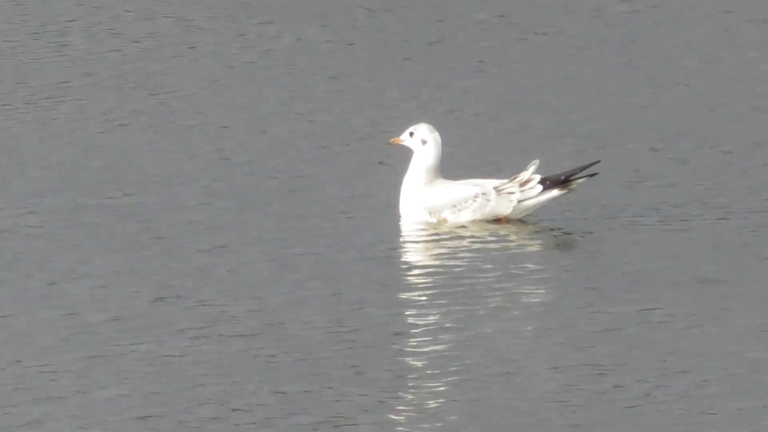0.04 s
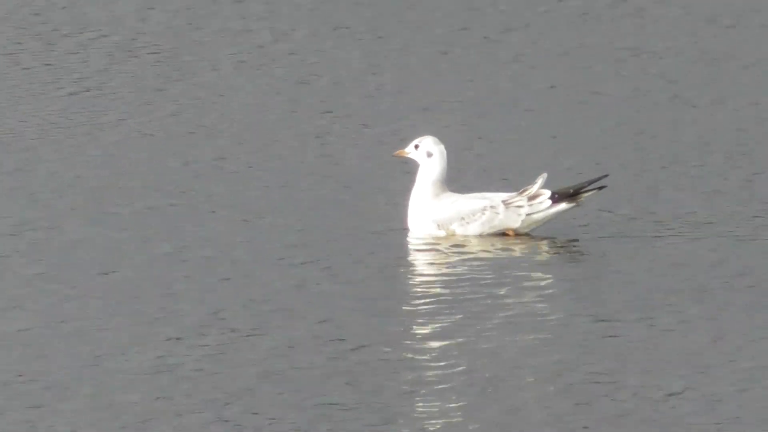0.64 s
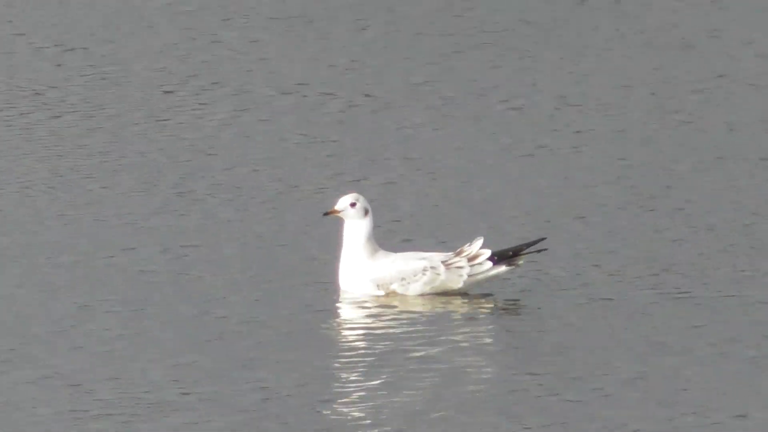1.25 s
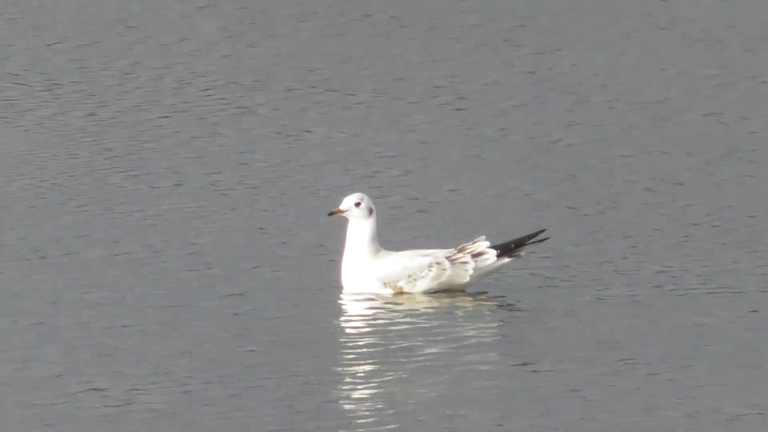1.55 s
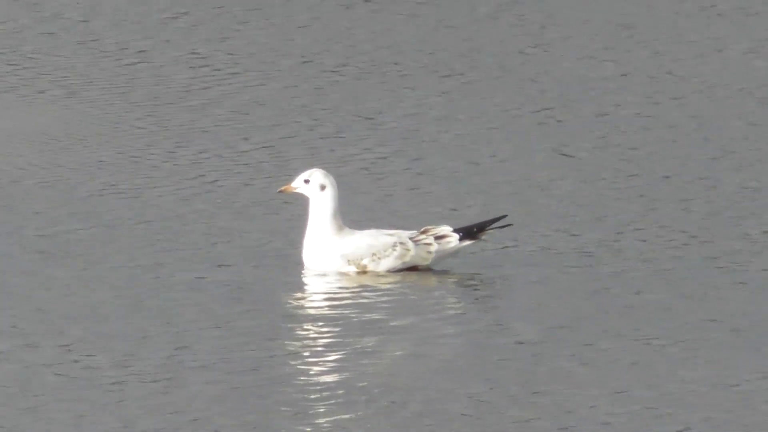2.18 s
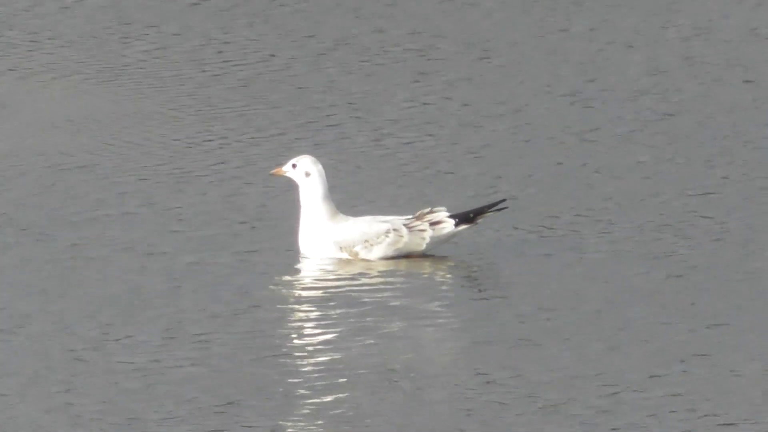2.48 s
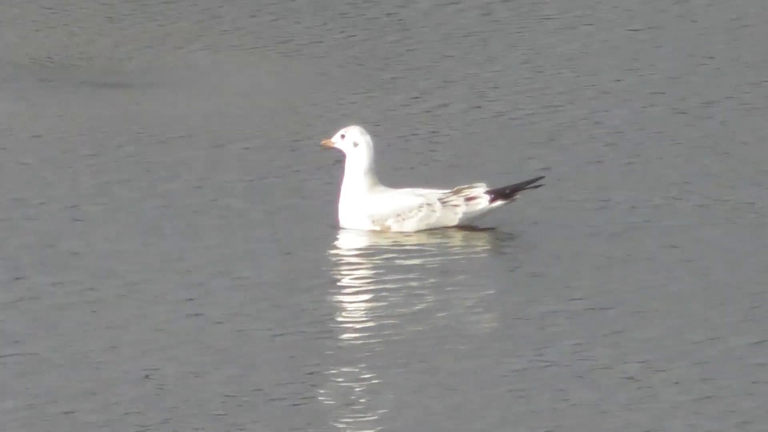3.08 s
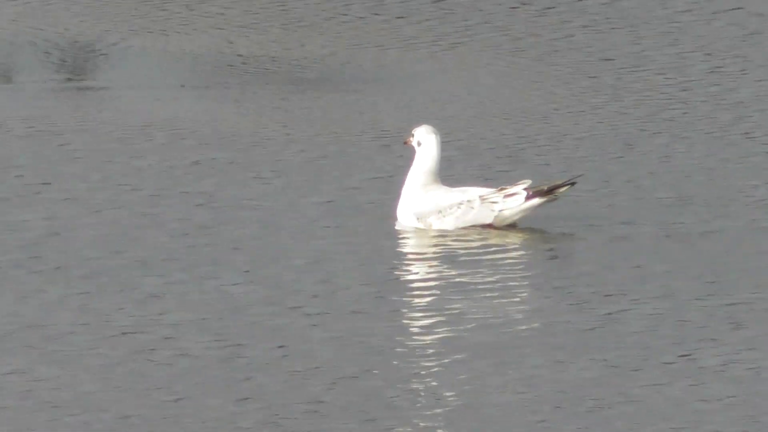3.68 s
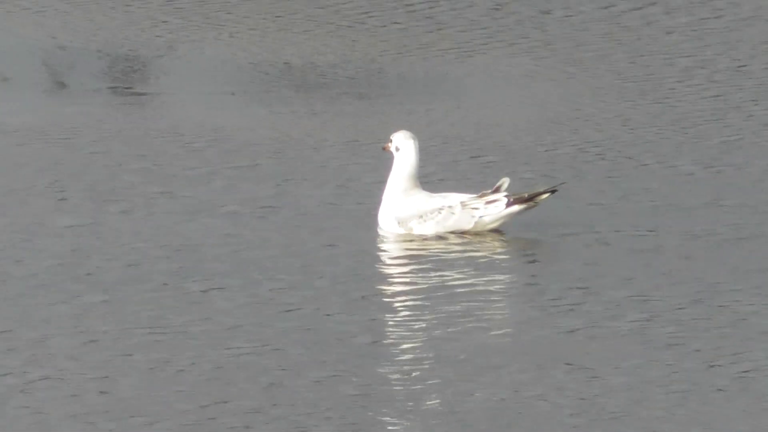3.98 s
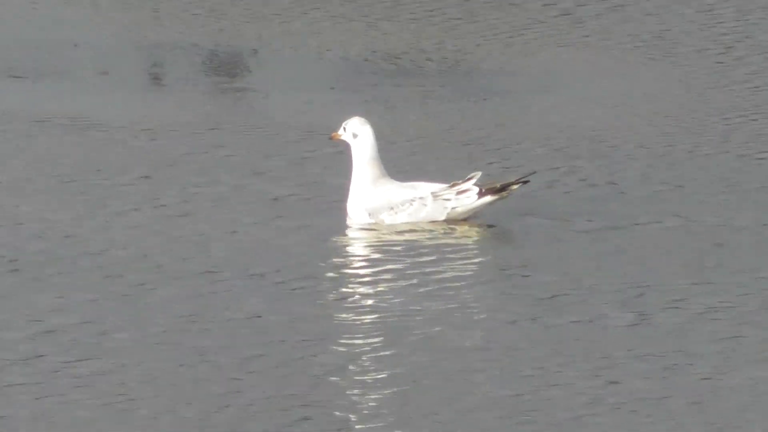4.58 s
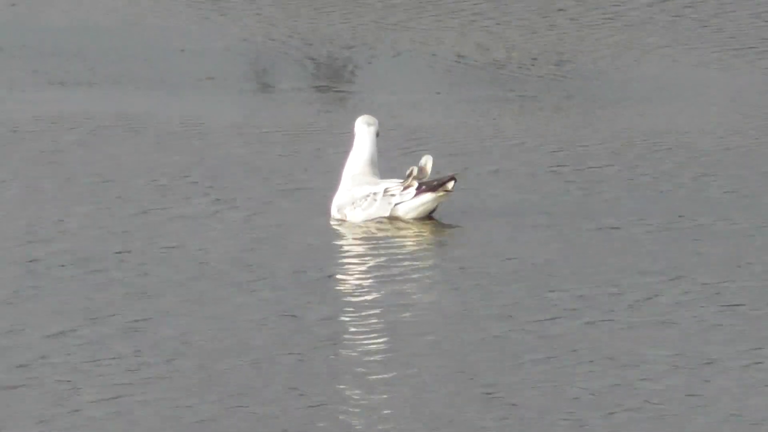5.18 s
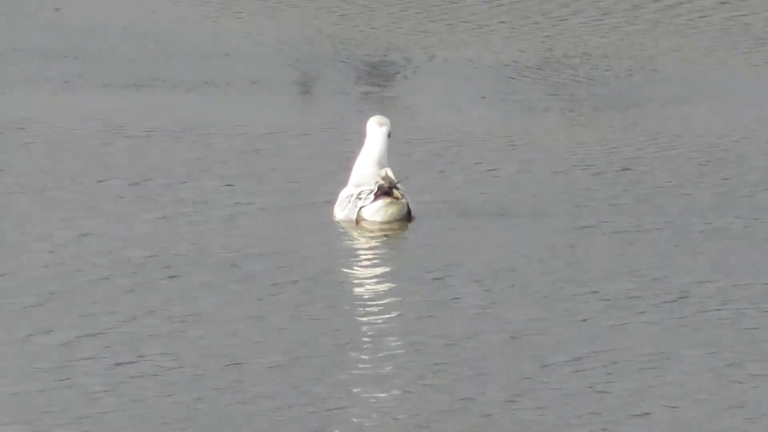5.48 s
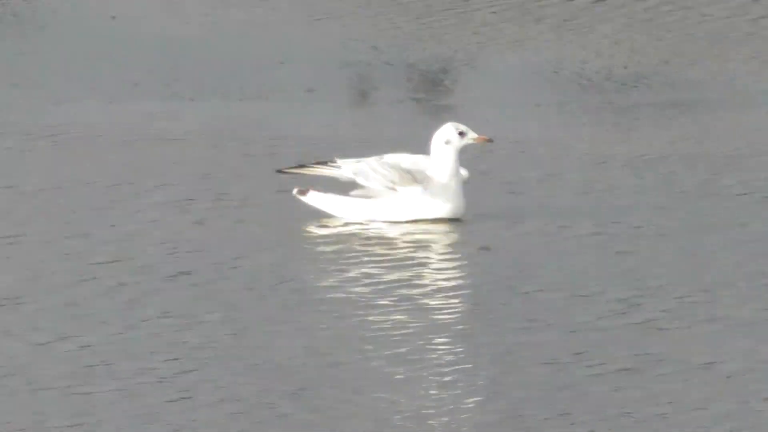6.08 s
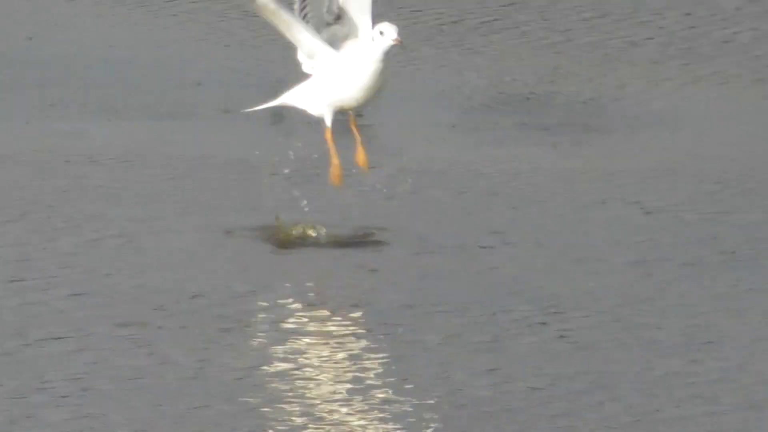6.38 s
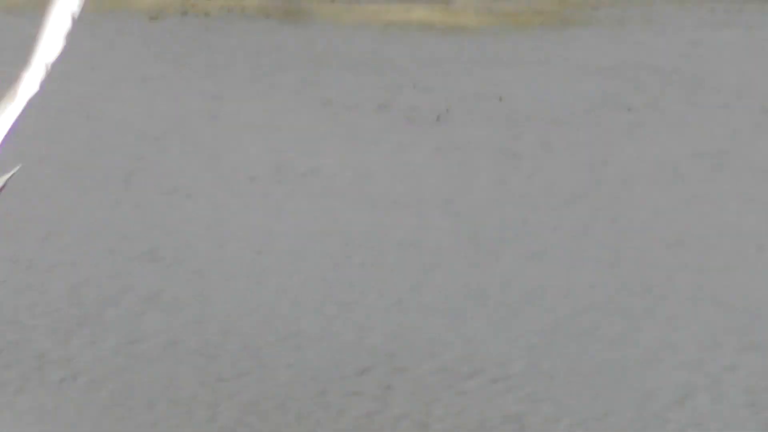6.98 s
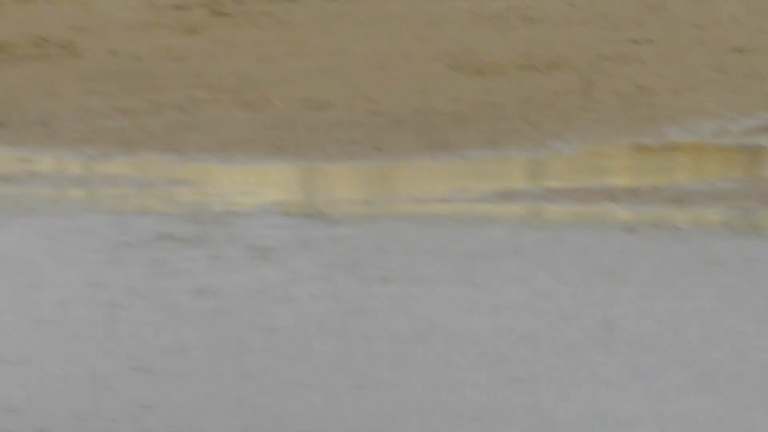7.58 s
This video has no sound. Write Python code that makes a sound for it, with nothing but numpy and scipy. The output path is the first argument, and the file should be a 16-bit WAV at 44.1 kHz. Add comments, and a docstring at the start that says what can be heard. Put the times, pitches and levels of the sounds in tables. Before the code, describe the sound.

Wind rumbles on the microphone while a camera motor buzzes softly; late on, a gull chirps briefly among sharp handling clicks.

```python
"""Gusts rumble on the microphone of a hand-held camera beside a pond, over a distant wash and steady hiss.
Right by the microphone the lens motor buzzes in spells, its steps ringing the barrel,
and late on the camera body clicks under the fingers. Near the end a gull, straight ahead,
whistles short falling chirps from its syrinx as it takes off; the banks return a dull tail."""
import sys
import numpy as np
from scipy import signal
from scipy.fft import rfft, irfft
from scipy.io import wavfile
from scipy.ndimage import uniform_filter1d

SR = 44100
rng = np.random.default_rng(int(sys.argv[2]) if len(sys.argv) > 2 else 0)


def output_pcm(signal):
    """Save a mono or channel-first signal as 16-bit PCM at the path in sys.argv[1].

    Samples are clipped to [-1, 1] before scaling.
    """
    pcm = np.clip(np.atleast_2d(signal).T, -1, 1) * 32767
    wavfile.write(sys.argv[1], SR, np.round(pcm).astype(np.int16))


N = 346185
TIME = np.arange(N) / SR
FREQS = np.fft.rfftfreq(N, 1 / SR)
SIDE = np.array([[1], [-1]])  # adds on the left, subtracts on the right

# Stereo width of the background, which sounds nearly mono from 2.5 to 5 kHz.
# Each row: frequency in Hz, side against mid in dB.
BACKGROUND_WIDTH = [(300, -5.5), (800, -9.5), (1500, -6), (2500, -27.5), (5000, -36), (8000, -7),
                    (9500, -5.5), (14000, -2.5)]


def undb(db):
    """Decibels to gain."""
    return 10 ** (np.asarray(db) / 20)


def unit(x):
    """Scale to rms 1."""
    return x / np.sqrt(np.mean(x ** 2) + 1e-30)


def curve(rows):
    """Join (seconds, value) points by straight lines."""
    return np.interp(TIME, *np.transpose(rows))


def envelope(s, length, attack_s, release_s):
    """Attack, hold and release; the two ramps are centred on the start and the end."""
    return np.clip(.5 + np.minimum((TIME - s) / attack_s, (s + length - TIME) / release_s), 0, 1)


def decay(t, t60):
    """Fall by 60 dB every t60 seconds."""
    return np.exp(-np.log(1000) * t / t60)


def response(points, hz):
    """Gain of a (Hz, dB) spectrum at the given frequencies."""
    f, db = np.transpose(points)
    return undb(np.interp(np.log(hz + 1), np.log(f), db))


def noise(points):
    """Noise of rms 1 with this spectrum, falling away outside its ends."""
    skirts = np.minimum(FREQS / points[0][0], 1) ** 2 / np.maximum(FREQS / points[-1][0], 1) ** 2
    return unit(irfft(rfft(rng.standard_normal(N)) * response(points, FREQS) * skirts, N))


def wide(points, side_points):
    """Stereo noise from a mid and an unrelated side part."""
    side = irfft(rfft(noise(points)) * response(side_points, FREQS), N)
    return noise(points) + SIDE * side


def walk(rate):
    """Smooth random drift of rms 1 that changes about rate times a second."""
    hold = max(int(SR / rate), 1)
    return unit(uniform_filter1d(np.repeat(rng.standard_normal(N // hold + 1), hold), hold)[:N])


def resonate(x, hz, width):
    """One resonance, gain 1 at its centre."""
    return signal.lfilter(*signal.iirpeak(hz, hz / width, fs=SR), x)


def add(track, s, sound):
    """Mix a short sound in at time s."""
    i = int(s * SR)
    track[i:i + len(sound)] += sound[:N - i]


def hiss(level_db=-66.5):
    """The microphone's own steady noise."""
    # Noise floor. Each row: frequency in Hz, relative density in dB.
    spectrum = [(1400, -26), (1750, -10.5), (2030, 1), (2350, -10.5), (2650, -6.5), (3000, -12.5),
                (4200, -13), (5000, -20.5), (5700, -14), (6600, -13.5), (7150, -1.5), (8000, 2.5),
                (8600, -8.5), (15500, -10)]
    return wide(spectrum, BACKGROUND_WIDTH) * undb(level_db)


def wash(gain_db=3.5, flicker_db=0.83):
    """The outdoors, heard from far off as a low wash that flickers slightly."""
    # Colour of the wash. Each row: frequency in Hz, relative density in dB.
    spectrum = [(100, -5.5), (280, 9), (420, 1), (700, 2.5), (900, -1.5), (1200, -7), (1600, -16),
                (2500, -19.5), (4500, -42)]
    # Its slow drift. Each row: time in seconds, relative level in dB.
    levels = [(0, -59.5), (.3, -65), (2.5, -64.5), (4.5, -62), (6.5, -62.5), (7.85, -61)]
    return wide(spectrum, BACKGROUND_WIDTH) * undb(curve(levels) + gain_db + flicker_db * walk(10))


def far_swells(fade_s=0.1):
    """Faint sinking sounds, each smeared into a narrow band by distance."""
    # Each row: start and length in seconds, first pitch, last pitch and bandwidth in Hz, level in dB.
    swells = [(-.04, .19, 2190, 1940, 210, -68.5), (.35, 0.21, 1570, 1460, 200, -76),
              (3.68, 0.09, 610, 568, 70, -61), (4.33, 0.44, 556, 400, 183, -62)]
    out = np.zeros(N)
    for s, length, first_hz, last_hz, width_hz, db in swells:
        hz = np.interp(TIME, [s, s + length], [first_hz, last_hz])
        smear = noise([(10, 0), (width_hz / 2, 0)])
        band = unit(smear * np.sin(2 * np.pi * np.cumsum(hz) / SR))
        out += band * undb(db) * envelope(s, length, fade_s, fade_s)
    return out


def chirr(hz=5850, width_hz=260):
    """A faint, thin chirr of narrow-band noise comes and goes."""
    # Each row: start and length in seconds, level at the crest in dB.
    spells = [(.52, .42, -85), (1.73, .42, -85), (4.28, 0.39, -84), (5.48, 0.43, -85)]
    swell = sum(undb(db) * np.sin(np.pi * np.clip((TIME - s) / length, 0, 1))
                for s, length, db in spells)
    return swell * unit(resonate(resonate(rng.standard_normal(N), hz, width_hz), hz, width_hz))


def gusts(attack_s=0.055, release_s=0.053, breeze_eddies_db=-13):
    """Strength of the wind's push and of its small eddies: gusts add their power to the breeze."""
    # Breeze between gusts. Each row: time in seconds, relative push in dB.
    breeze = [(0, -49), (.55, -46), (1.2, -40), (2.7, -44), (3.3, -47.5), (4.15, -53), (4.7, -42),
              (5.85, -50.5), (7.4, -53.5)]
    # Gusts. Each row: start and length in seconds, relative push in dB, eddies against the push in dB.
    blows = [ (0.205, .26, -35.5, -13.5), (0.573, 0.29, -33, -13), (0.897, 0.091, -35, -10),
             (0.985, 0.127, -35.5, -2), (1.486, 0.19, -33.5, -12.5), (1.697, .29, -43, -10.5),
             (2.09, 0.12, -38, -17), (2.28, 0.14, -34.5, -13.5), (2.422, .11, -32, -8),
             (2.587, 0.11, -32.5, -25.5), (2.944, 0.18, -37.5, -16), (3.332, 0.27, -44, -20.5),
             (3.75, 0.21, -48.5, -6), (4.562, 0.21, -40, -17), (4.91, 0.17, -38.5, -26),
             (5.154, 0.18, -36.5, -11.5), (5.416, 0.051, -38.5, -23), (5.549, 0.053, -35, -24),
             (5.95, 0.22, -47.5, -15), (6.336, 0.21, -37.5, -21), (6.577, 0.23, -43.5, -18.5),
             (6.964, 0.22, -48, -39), (7.668, 0.46, -30.5, -4.5)]
    push_power = undb(curve(breeze)) ** 2
    eddy_power = push_power * undb(breeze_eddies_db) ** 2
    for s, length, db, eddies_db in blows:
        power = (undb(db) * envelope(s, length, attack_s, release_s)) ** 2
        push_power += power
        eddy_power += power * undb(eddies_db) ** 2
    return np.sqrt(push_power), np.sqrt(eddy_power)


def wind(push_db=-2, push_churn_db=1.46, eddy_churn_db=3.5):
    """Large eddies push both microphone ports nearly alike; small ones flurry and differ between them."""
    # Rumble of the large eddies. Each row: frequency in Hz, relative density in dB.
    push_spectrum = [(11, -13), (18, -5), (43, 1.5), (69, 2), (114, -1), (170, -12), (220, -56),
                     (370, -120)]
    # Flutter of the small eddies. Each row: frequency in Hz, relative density in dB.
    eddy_spectrum = [(110, -11.5), (165, 4.5), (240, -4), (310, -12), (400, -20), (600, -28.5), (1000, -43),
                     (2000, -68)]
    # Stereo width of the wind. Each row: frequency in Hz, side against mid in dB.
    width = [(30, -14), (80, -10), (170, -6), (320, 0), (700, 2)]
    push_gain, eddy_gain = gusts()
    push = wide(push_spectrum, width) * undb(push_db + push_churn_db * walk(30))
    eddies = wide(eddy_spectrum, width) * undb(eddy_churn_db * walk(45))
    return push * push_gain + eddies * eddy_gain


def buffets(port_lag_s=0.00062):
    """Single eddies slap one port, then the other: a pressure dip between two smaller swells."""
    # Each row: centre in seconds, peak in dB, width in seconds.
    slaps = [(.668, -36, 0.00072), (1.012, -23.5, 0.00064), (1.017, -23, .0035), (1.5449, -28, .00065),
             (1.57, -31, .003), (1.586, -23, 0.0019), (1.651, -22, 0.00045), (2.107, -25.5, 0.0016),
             (2.376, -27, 0.00077), (2.491, -27.5, .0021), (2.522, -24, 0.0013), (2.984, -27, 0.0031),
             (6.382, -29, 0.0045)]
    out, t = np.zeros((2, N)), np.linspace(-.03, .03, int(.06 * SR))
    for s, db, width_s in slaps:
        offset_squared = ((t + SIDE * port_lag_s / 2) / width_s) ** 2
        pulses = (offset_squared - 1) * np.exp(-offset_squared / 2)
        for port, pulse in zip(out, pulses):
            add(port, s - len(t) / SR / 2, undb(db) * pulse)
    return out


def motor_steps(frame_hz=59.94, step_hz=457, count=3, first_s=.009, backlash_s=.0004, slop_s=.00004,
                limp_db=2.5, burst_scatter_db=.8, step_scatter_db=1.6):
    """Once a frame the stepper makes a burst of quick steps; bursts alternate strong and weak."""
    steps = np.zeros(N)
    for frame, s in enumerate(np.arange(first_s, TIME[-1] - 1 / frame_hz, 1 / frame_hz)):
        burst_db = burst_scatter_db * rng.standard_normal() - limp_db * (frame % 2)
        # play in the gears makes each burst catch a little early or late
        start = s + backlash_s * rng.standard_normal()
        for k, (late, size) in enumerate(rng.standard_normal((count, 2))):
            add(steps, start + k / step_hz + slop_s * late, undb([burst_db + step_scatter_db * size]))
    return steps


def lens_motor(gain_db=-0.56, ramp_s=0.0087, load_hz=32, load_db=0.74, scrape=.05, scrape_s=.002):
    """Beside the microphone, the motor's steps ring the lens barrel under a wavering load."""
    # Barrel resonances. Each row: centre and width in Hz, relative level in dB.
    barrel = [(1350, 43, 4), (1870, 170, -6), (2200, 150, -10.5), (2506, 137, 3), (3145, 76, -0.5),
              (3310, 104, 4), (3630, 72, 0.5), (3910, 49, -1.5), (5480, 480, -15), (6040, 230, -14.5),
              (7060, 900, -10)]
    # Short runs of the motor over long ones. Each row: start and length in seconds, relative level in dB.
    runs = [ (2.934, 0.18, -65.5), (3.121, .37, -64), (3.5, 0.37, -73.5), (3.617, 0.031, -68),
            (3.709, 0.049, -65), (3.789, .155, -70), (3.96, 0.93, -78.5), (5.665, 2.15, -70.5),
            (6.11, 0.12, -66), (6.378, .21, -65.5), (6.722, 0.031, -61.5), (6.81, 0.73, -67),
            (7.551, 0.2, -62.5)]
    steps = motor_steps()
    # the lead screw scrapes briefly after each step
    step_tails = signal.lfilter([1], [1, -np.exp(-1 / (scrape_s * SR))], steps)
    force = steps + scrape * rng.standard_normal(N) * step_tails
    buzz = unit(sum(undb(db) * resonate(force, hz, width) for hz, width, db in barrel))
    power = sum((undb(db) * envelope(s, length, ramp_s, ramp_s)) ** 2 for s, length, db in runs)
    return buzz * np.sqrt(power) * undb(gain_db + load_db * walk(load_hz))


def body_clicks(grit, gain_db=-21, crack_db=-1, pivot_hz=3000, panel_t60=0.048, crack_t60=0.0057):
    """Each snap rings the camera shell and the pressed panel, with a short gritty crack."""
    # Each row: start in seconds, relative level in dB, shell tilt in dB per octave (also lifts the
    # crack), contact time in seconds, panel pitch in Hz, panel ring in relative dB.
    clicks = [(5.404, -42, -1, 0.0022, 2200, -15), (6.798, -44, 7, 0.0015, 900, -15),
              (6.8415, -30.5, -3.5, 0.00092, 1020, 1.5), (6.8915, -24.5, 2, 0.002, 535, 5),
              (7.018, -35, -3, .001, 1200, -15), (7.2823, -7, 4, 0.00095, 774, -10.5),
              (7.505, -32.5, -8, 0.00041, 1450, -2), (7.584, -28.5, -6, 0.001, 780, 3),
              (7.703, -35, -8.5, 0.0017, 1310, -8), (7.728, -40, -9, .004, 1980, 6.5)]
    # Shell modes. Each row: frequency in Hz, 60 dB decay time in seconds, relative level in dB.
    shell = [(308, 0.034, -24.5), (526, 0.028, -32), (730, 0.038, -22), (930, 0.025, -6.5),
             (1270, 0.0095, 0), (1906, 0.032, -13), (2100, 0.022, -9.5), (3850, 0.0075, -18),
             (4170, 0.0076, -7), (4570, 0.0089, -4), (6040, 0.005, -14), (7440, 0.0059, -25),
             (8380, 0.011, -3.5), (9600, 0.0032, -11), (11600, 0.0072, -9)]
    out, t = np.zeros(N), TIME[:SR // 10]
    for s, db, tilt_db, contact_s, panel_hz, panel_db in clicks:
        modes = [(hz, t60, mode_db + tilt_db * np.log2(hz / pivot_hz)) for hz, t60, mode_db in shell]
        modes.append((panel_hz, panel_t60, panel_db))
        ring = sum(undb(mode_db) * decay(t, t60) * np.sin(2 * np.pi * hz * t)
                   for hz, t60, mode_db in modes)
        # the crack lasts while the parts grate on each other, then dies quickly
        crack = grit[int(s * SR):][:len(t)] * decay(np.maximum(t - contact_s, 0), crack_t60)
        add(out, s, undb(db + gain_db) * (ring + undb(crack_db + tilt_db) * crack))
    return signal.sosfilt(signal.butter(3, 12000, fs=SR, output="sos"), out)


def finger_rubs(grit, attack_s=0.017, release_s=.01, grain_db=3):
    """Fingers slide on the shell with a grainy friction noise."""
    # Each row: start and length in seconds, level in dB.
    rubs = [(6.815, 0.048, -64), (6.882, 0.014, -52.5), (6.903, .04, -67), (7.06, 0.11, -85)]
    sliding = sum(undb(db) * envelope(s, length, attack_s, release_s) for s, length, db in rubs)
    return grit * sliding * undb(grain_db * walk(300))


def handling(rock_hz=1300):
    """Clicks and rubs; their lows rock the camera and reach the ports up to a quarter cycle apart."""
    grit = noise([(2000, -14.5), (4400, 1.0), (6300, -5.0), (7400, 6.5), (8600, 1.0),
                  (10300, -8), (11600, -6), (13000, -13), (15000, -15)])
    mid = body_clicks(grit) + finger_rubs(grit)
    rocking = irfft(rfft(mid) * 1j / np.hypot(1, FREQS / rock_hz), N)
    return mid + SIDE * rocking


def banks(calls, delay_s=0.0083, t60=2.0, tail_db=-6, dull_hz=3400, airborne_s=6.6, turned_db=-9):
    """The banks of the pond return a dull tail, weaker once the bird is airborne and has turned away."""
    t = TIME[:2 * SR]
    tail = rng.standard_normal((2, len(t))) * decay(t, t60) * (t > delay_s)
    tail *= undb(tail_db) / np.sqrt(np.sum(tail[0] ** 2))
    dull = signal.sosfilt(signal.butter(3, dull_hz, fs=SR, output="sos"), calls)
    dull *= undb(turned_db * (TIME > airborne_s))
    mid, side = signal.fftconvolve(dull[None], tail, axes=1)[:, :N]
    return mid + SIDE * side / 4


def gull(scoop_s=0.0066, scoop_depth=0.068, attack_s=.006, release_s=0.0089):
    """The syrinx whistles a note that scoops up and falls; its harmonics slide through the throat."""
    # Each row: start and length in seconds, top pitch and the pitch it falls to in Hz, fall time in
    # seconds, level before the throat in dB, second and higher harmonics in relative dB, rasp from 0 to 1.
    chirps = [ (5.879, 0.053, 2770, 2450, 0.02, -56, 0.5, 1.5, 0.01),
              (6.015, 0.048, 2760, 2334, .021, -54, 0, -8, 0),
              (6.163, 0.071, 2697, 2374, .027, -55.5, -5, -7, .1),
              (6.319, 0.044, 2627, 2386, 0.02, -65, -8, -13, 0),
              (6.934, 0.013, 2800, 2650, 0.013, -57, -10, -15, 0.43),
              (6.947, 0.019, 3630, 3060, .006, -58.5, -25, -25, 0.1),
              (6.954, 0.023, 2714, 2120, .008, -59.5, -18, -22, 0.06),
              (7.108, 0.0072, 2480, 2430, .015, -57, -3, -18, 0.34),
              (7.126, 0.0098, 2630, 2450, .007, -53.5, -2, -14, 0),
              (7.139, .028, 2404, 2150, .02, -59.5, -13, -16, 0.53),
              (7.27, 0.037, 2810, 1880, 0.037, -51.5, -14, -12, 0.07),
              (7.458, 0.044, 2650, 2200, .028, -64.5, -5, -20, .12)]
    # Resonances of the throat and open beak. Each row: frequency in Hz, gain in dB.
    throat = [(2200, -2), (2700, 0), (3600, -2), (4700, -14), (5050, -13), (5300, -3), (5500, 1),
              (7000, -1), (7500, 5), (8300, 3), (9800, -16), (11000, -20), (14000, -32)]
    out, waver, flutter = np.zeros(N), walk(500), walk(200)
    for s, length, top_hz, end_hz, fall_s, db, second_db, higher_db, rasp in chirps:
        gate = envelope(s, length, attack_s, release_s)
        on = gate > 0
        past_top = TIME[on] - s - scoop_s
        rise = top_hz * (1 - scoop_depth * (past_top / scoop_s) ** 2)
        fall = end_hz + (top_hz - end_hz) * np.exp(-(past_top / fall_s) ** 2)
        pitch = np.where(past_top < 0, rise, fall) * (1 + (.003 + .03 * rasp) * waver[on])
        flutter_db = (.7 + 3 * rasp) * flutter[on]
        phase = 2 * np.pi * np.cumsum(pitch) / SR
        harmonics_db = [0, second_db, higher_db, higher_db, higher_db]
        note = sum(response(throat, k * pitch) * undb(harmonic_db) * np.sin(k * phase)
                   for k, harmonic_db in enumerate(harmonics_db, 1))
        # a rasping syrinx alternates strong and weak cycles, which puts lines between the harmonics
        note *= 1 + 2 * rasp * np.cos(phase / 2)
        out[on] += np.sqrt(2) * gate[on] * undb(db + flutter_db) * note
    return out


def scene():
    """The gull is straight ahead on the pond; the lens motor reaches both microphone ports alike."""
    calls = gull()
    outdoors = calls + banks(calls) + wind() + buffets() + wash() + far_swells()
    return outdoors + hiss() + chirr() + lens_motor() + handling()


def record(dry):
    """The camera cuts the treble steeply above 15750 Hz."""
    return signal.sosfilt(signal.ellip(10, .2, 70, 15750, fs=SR, output="sos"), dry)


dry = scene()
out = record(dry)
output_pcm(out)
```